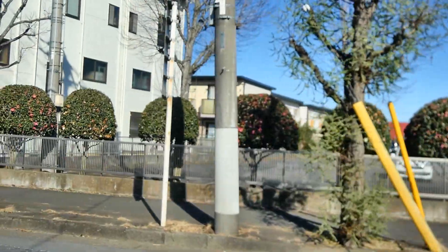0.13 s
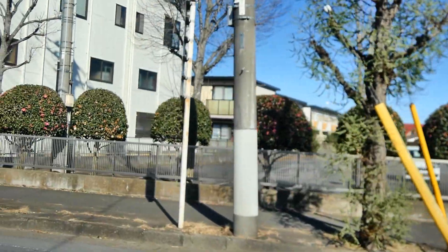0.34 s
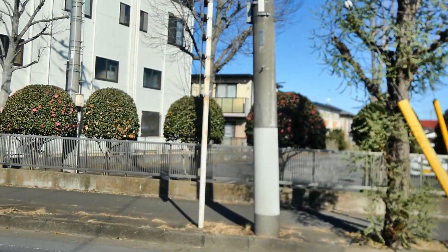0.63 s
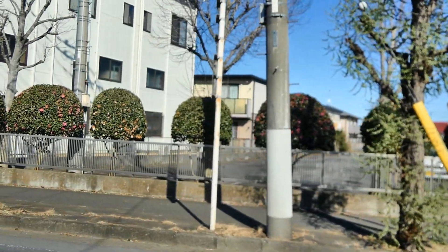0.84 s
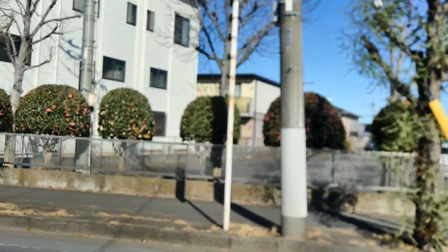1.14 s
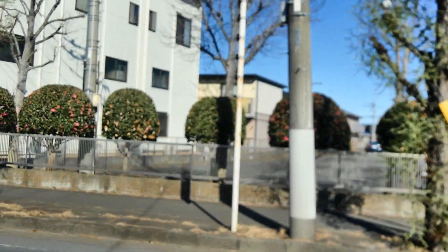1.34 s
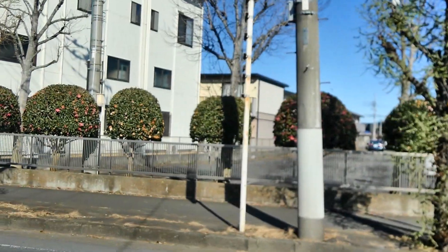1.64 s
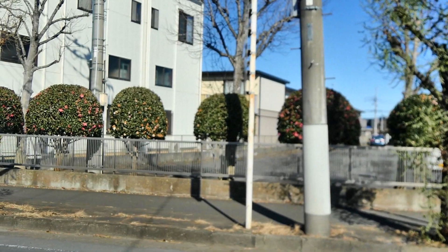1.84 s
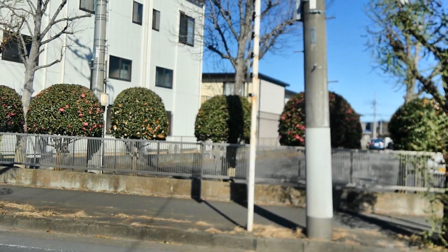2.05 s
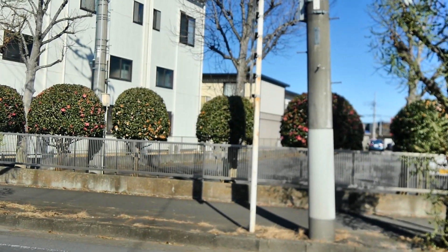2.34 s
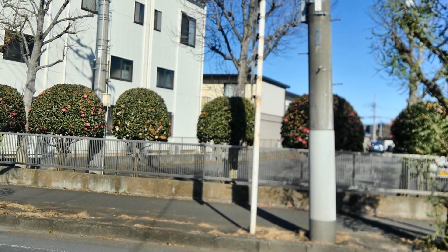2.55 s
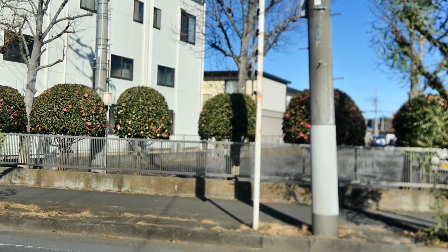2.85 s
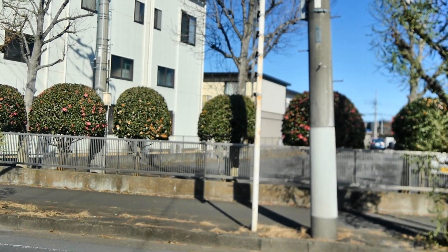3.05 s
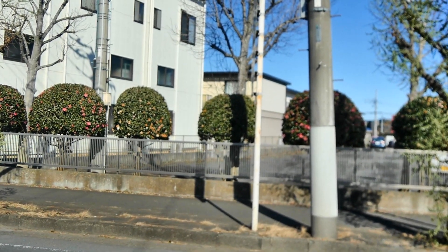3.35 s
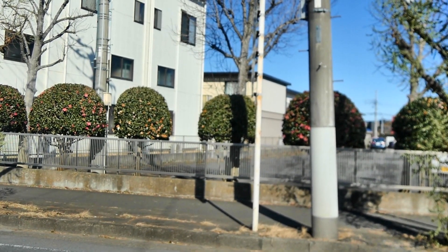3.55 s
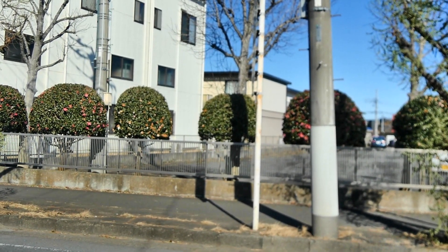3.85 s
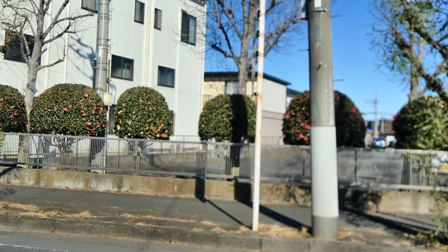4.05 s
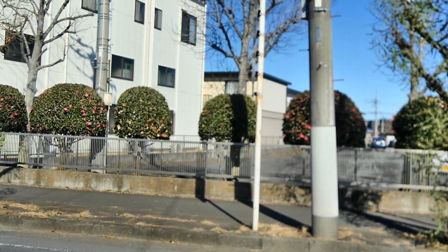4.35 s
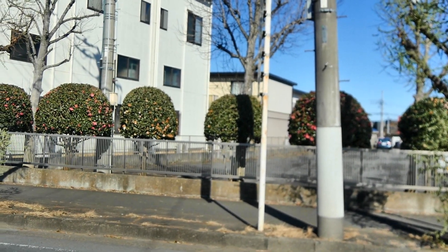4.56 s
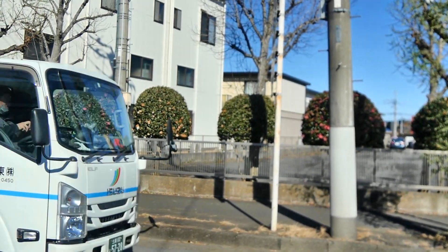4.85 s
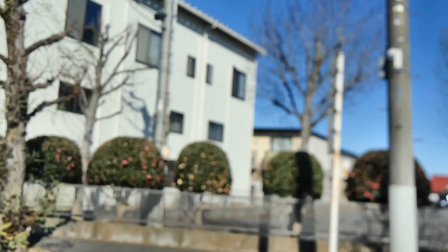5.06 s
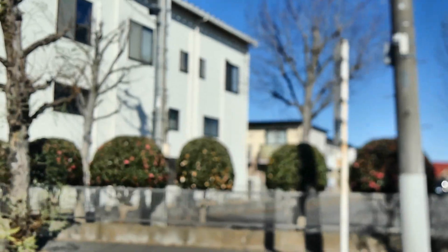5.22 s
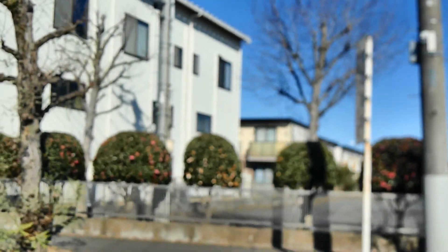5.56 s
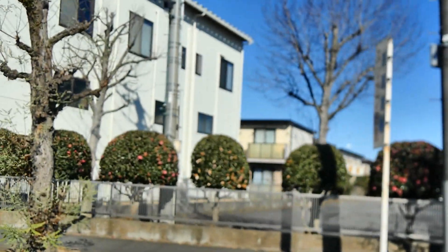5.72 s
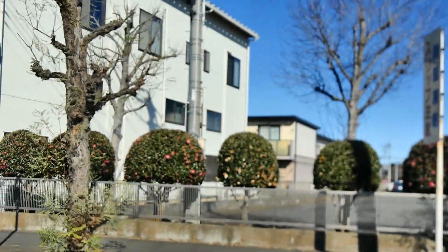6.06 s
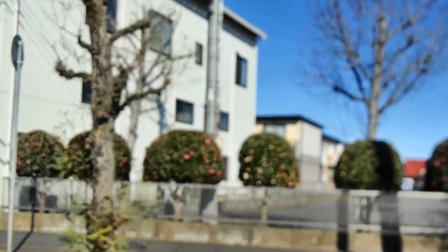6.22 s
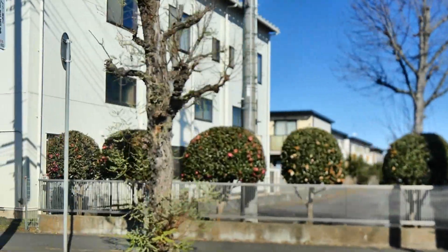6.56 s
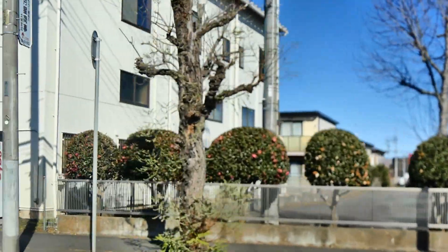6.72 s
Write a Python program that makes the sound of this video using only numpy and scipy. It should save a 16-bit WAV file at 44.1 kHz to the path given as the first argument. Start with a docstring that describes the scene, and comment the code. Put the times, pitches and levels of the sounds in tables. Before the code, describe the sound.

A stationary bus idles quietly, with soft low drumming, pump hum and faint hiss captured by a phone in the cabin. Dull trim knocks, short air puffs and a thin brake squeal come and go; a vehicle's tyre roar swells outside. The sound blanks out briefly, then bursts back with heavy diesel growl, clatter, booming body resonance and thin whines, the note climbing under acceleration.

```python
"""Diesel bus at a stop and pulling away

In the cabin of a six-cylinder bus the engine idles, all sound drops out for a quarter second, then it pulls away.
Firing makes periodic lines and knock bursts; coloured noise makes body drumming, injector clatter and hiss.
Filtered noise makes air valve puffs and bright ticks, contact noise rings the trim's modes, and gliding sines
make squeal, whines and low hums. Passing traffic swells in two noise bands.
A phone hears it all, with a treble notch and a cut top.
"""
import sys
import numpy as np
from scipy import signal
from scipy.fft import rfft, irfft, next_fast_len
from scipy.io import wavfile
from scipy.ndimage import uniform_filter1d

SR = 44100
rng = np.random.default_rng(int(sys.argv[2]) if len(sys.argv) > 2 else 0)


def file_out(sig):
    """Save sig as 16-bit WAV at sys.argv[1]."""
    # one column per channel
    cols = np.atleast_2d(sig).T
    # limit, then scale
    lim = np.clip(cols, -1, 1)
    pcm = np.round(lim * 32767).astype(np.int16)
    wavfile.write(sys.argv[1], SR, pcm)


def undo_db(level):
    """Turn decibels back into plain size, where 20 dB means ten times bigger."""
    steps = np.asarray(level, float) / 20
    return 10 ** steps


N = 303849
T = np.arange(N) / SR
STEP = 64  # samples between points of the slow grid, on which slow changes are drawn
DROPOUT_START_S, DROPOUT_END_S = 5.1712, 5.4166
PULLING = T > DROPOUT_END_S - .1  # the engine's state switches inside the silence
CYCLE_HZ = 4.374  # idle: one full cycle of six firings
LEFTWARD = np.array([[1.5], [-1.5]])  # dB, left and right


def walk(rate):
    """Smoothed random process: levels held 1 / rate s and slewed twice; spread near 1, on the slow grid."""
    k = int(SR / STEP / rate)
    held = np.repeat(rng.standard_normal(N // STEP // k + 2), k)
    return 1.02 * uniform_filter1d(uniform_filter1d(held, k), k)


def fine(slow):
    """Linear interpolation from the slow grid to every sample."""
    return np.interp(T, np.arange(len(slow)) * STEP / SR, slow)


def curve(rows):
    """Linear interpolation of a table's columns against time."""
    s, *columns = np.transpose(rows)
    return [np.interp(T, s, c) for c in columns]


def read(rows, hz):
    """Frequency response: gain at hz of a (frequency [Hz], level [dB]) table, on a logarithmic axis."""
    table = np.array(rows)
    return undo_db(np.interp(np.log(hz), np.log(table[:, 0]), table[:, 1]))


def bell(s, quarter):
    """Smooth swell: 1 at time s, a quarter of that at quarter seconds to either side."""
    return 1 / (1 + ((T - s) / quarter) ** 2) ** 2


# stereo spread of the noises: (frequency [Hz], side minus mid level [dB])
WIDTH = [(25, -28), (60, -35.5), (110, -25.5), (200, -27.5), (380, -20.5), (700, -7), (1290, -1),
         (2380, -0.5), (4400, -1.5), (8120, -1.5), (15000, -4)]


def noise(colour, lo_hz, hi_hz, flicker_db, rate):
    """Spectral shaping: stereo noise in octave bands that flicker alone; rms near 1 from lo_hz to hi_hz."""
    size = next_fast_len(N)
    f = np.maximum(np.arange(size // 2 + 1) * SR / size, 1)
    gain, octave = read(colour, f), np.log2(f)
    mid_side = rfft(rng.standard_normal((2, size))) * [gain, gain * read(WIDTH, f)]
    lowest = int(np.log2(max(colour[1][0], 32)))
    highest = int(np.log2(colour[-2][0])) + 1
    out = 0
    for k in range(lowest, highest + 1):
        band = np.cos(np.pi / 2 * np.clip(octave - k, -1, 1)) ** 2
        flicker = fine(undo_db(flicker_db * walk(rate)))
        out = out + flicker * irfft(mid_side * band, size)[:, :N]
    rms = np.sqrt(2 * np.sum(gain[(f > lo_hz) & (f < hi_hz)] ** 2) / size)
    return np.array([out[0] + out[1], out[0] - out[1]]) / rms


def sine(hz, db, waver_db, rate, blur):
    """Modulated partial: level wanders by waver_db [dB] and phase by blur [rad]."""
    phase = 2 * np.pi * (np.cumsum(hz + 0 * T) / SR + rng.random()) + fine(blur * walk(rate))
    return np.sqrt(2) * undo_db(db) * fine(undo_db(waver_db * walk(rate))) * np.sin(phase)


def tone(rows, waver_db, rate, blur):
    """Frequency glide: thin tones that fade in and out, sometimes overlapping slightly."""
    fade_share = 0.21  # share of a tone's length spent fading in, and again out
    times = np.sort(np.ravel([(s, s + length) for s, length, *_ in rows]))
    hz = np.interp(T, times, np.ravel([row[2:4] for row in rows]))
    gain = 0
    for s, length, _, _, db in rows:
        to_nearer_end = np.minimum(T - s, s + length - T)
        gain = gain + undo_db(db) * np.clip(to_nearer_end / (fade_share * length), 0, 1)
    return gain * sine(hz, 0, waver_db, rate, blur)


# the engine on pulling away:
# (time [s], firing rate [Hz], load [dB], level of the note at four times the firing rate [dB rms])
PULL = [(5.44, 35.9, -0.5, -20.5), (5.57, 36.34, -1, -25), (5.716, 36.77, 0, -21), (5.8, 37.14, 0.5, -21),
        (5.84, 37.14, .5, -25), (5.955, 36.98, 1.5, -22), (5.986, 45.18, 2, -22), (6.146, 48.23, 2, -18.5),
        (6.17, 49.45, 3, -33), (6.232, 51.43, 3.5, -18), (6.27, 52.47, 3, -25), (6.348, 54.91, 3.5, -18),
        (6.385, 55.34, 5.5, -31), (6.415, 55.6, 3.5, -29), (6.44, 56.33, 3, -16), (6.462, 57.2, 4, -15.5),
        (6.53, 60.42, 4, -18), (6.586, 61.32, 5, -24), (6.646, 62.04, 5, -14), (6.748, 66.1, 5.5, -20.5),
        (6.782, 65.96, 3.5, -16.5), (6.89, 66.33, 1.5, -18)]


def pull_away():
    """Engine kinematics: firing rate [Hz], load [dB] and the fourth multiple's level [dB] against time."""
    return curve(PULL)


def eased():
    """Sigmoid transition: near 0 while the load comes on, towards 1 once the engine runs freely."""
    middle_s, length_s = 5.755, 0.099
    return (1 + np.tanh((T - middle_s) / length_s)) / 2


def load_gain(idle_db, pull_db, slope):
    """Load dependence: a fixed idle level, then slope dB gained for each dB of load."""
    return undo_db(np.where(PULLING, pull_db + slope * pull_away()[1], idle_db))


# traffic outside: (nearest time [s], hiss [dB], tyre roar [dB], time to a quarter of the power [s])
PASSES = [(.4, -63, -56, 0.34), (1.15, -67, -70, 0.27), (3.76, -69.5, -54, .05), (4.32, -64.5, -59, 0.22),
          (5.0, -63.5, -46, 0.66)]


def traffic_powers():
    """Incoherent addition: the passes' hiss powers and tyre roar powers each sum."""
    hiss = sum(undo_db(db) ** 2 * bell(s, quarter) for s, db, _, quarter in PASSES)
    roar = sum(undo_db(db) ** 2 * bell(s, quarter) for s, _, db, quarter in PASSES)
    return hiss, roar


# hiss of passing traffic: (frequency [Hz], relative density per Hz [dB])
PASS_HISS = [(2500, 0), (4000, -3.5), (6500, -10), (8000, -9.5), (10300, -6), (12500, -12.5), (14500, -13),
             (15600, -28.5)]


def traffic_hiss(power):
    """Amplitude modulation: treble noise swells with each pass, up to the pull-away."""
    return np.sqrt(power) * ~PULLING * noise(PASS_HISS, 4800, 17500, 0.81, 19)


# hiss in the cabin at idle, then on pulling away: (frequency [Hz], relative density per Hz [dB])
HISS = [(2060, -5), (3500, -1), (4640, -7.5), (6740, -9), (7730, -11.5), (9150, -8), (11300, -8.5),
        (14500, -20.5), (15600, -33)]
PULL_HISS = [(2060, -27), (3500, 0), (4640, -3), (6000, -5.5), (7000, -9.5), (7730, -9.5), (9150, -6),
             (11300, -8), (14500, -20), (15600, -27)]


def cabin_hiss():
    """Broadband noise radiation: it follows the load, with more hiss while the load comes on."""
    take_up_db = 4
    gain = load_gain(-68, -59.5, 0.49) * undo_db(PULLING * take_up_db * (1 - eased()))
    pull = noise(PULL_HISS, 5100, 14000, 0.96, 14.0)
    idle = noise(HISS, 5160, 14000, 0.32, 5.5)
    return gain * np.where(PULLING, pull, idle)


# thin driveline whines: (time [s], length [s], first frequency [Hz], last frequency [Hz], level [dB rms])
WHINES = [(-.08, 0.42, 1740, 1750, -60.5), (.32, 0.17, 1745, 1740, -66), (.52, 0.13, 1745, 1760, -66),
          (2.39, .13, 3130, 3100, -68.5), (5.02, 0.11, 2000, 1980, -61), (5.75, 0.301, 2003, 1930, -56.5),
          (6.3, 0.41, 1957, 1950, -55), (6.72, .2, 1938, 1988, -55.5)]


def whines():
    """Narrow-band tonal radiation: driveline whines glide slightly, nearer the left."""
    return tone(WHINES, 3.5, 40, .9) * undo_db(LEFTWARD)


# brake squeal: (time [s], frequency [Hz], level [dB rms])
SQUEAL = [(.54, 9615, -90), (.565, 9600, -62), (.62, 9620, -60), (.69, 9640, -52.5), (.728, 9690, -57),
          (.745, 9690, -76), (.78, 9700, -72), (.82, 9720, -84), (.87, 9720, -84), (.915, 9730, -70),
          (.95, 9745, -88), (1.01, 9690, -88), (1.03, 9680, -63), (1.064, 9665, -59), (1.1, 9630, -62),
          (1.17, 9615, -57), (1.2, 9615, -74), (1.225, 9610, -62), (1.25, 9590, -70), (1.265, 9580, -65),
          (1.31, 9545, -68), (1.34, 9525, -57), (1.43, 9490, -67), (1.447, 9495, -80), (1.48, 9500, -67),
          (1.504, 9500, -80), (1.53, 9505, -67), (1.565, 9490, -80), (1.63, 9480, -80), (1.69, 9475, -74),
          (1.72, 9470, -80), (1.75, 9470, -70), (1.78, 9470, -91)]


def squeal():
    """Sustained oscillation: the brake sings one thin, wavering line, nearer the left."""
    hz, db = curve(SQUEAL)
    return sine(hz, db, 3.6, 60, .7) * undo_db(LEFTWARD)


# spectra of the bright jet, and of its body: (frequency [Hz], relative density per Hz [dB]) in each
PUFF = [
    [(2940, -40), (3800, -18), (4400, -11.5), (5050, -20), (5370, -12.5), (6250, -3.5), (6650, -4.5),
     (7450, -7), (8080, -5), (8680, -8.5), (10100, -2.5), (11500, -7), (12700, -11), (13600, -14.5),
     (15600, -21.5)],
    [(500, -35.5), (900, 5.5), (1500, -7.5), (2300, -7.5), (3500, -8.5), (5000, -10.5), (7000, -32.5)],
]
# air valve puffs, and short bright ticks that go with knocks:
# (time [s], jet [dB], body [dB], open time [s])
PUFFS = [(.28, -65, -73, .08), (.423, -59, -70, .004), (0.964, -61, -64, 0.025), (1.015, -64, -65, 0.025),
         (1.79, -57, -56, 0.0095), (1.806, -53.5, -59, 0.027), (1.847, -61, -56.5, 0.026),
         (1.917, -47.5, -58, 0.021), (1.956, -49, -56, 0.035), (2.845, -63.5, -63, 0.048),
         (2.95, -63.5, -58, 0.026), (3.968, -66.5, -57, 0.01), (4.371, -50.5, -59, 0.015),
         (4.381, -50.5, -45.5, 0.021), (4.393, -47.5, -47.5, 0.011), (4.413, -50.5, -50.5, 0.024),
         (5.492, -47, -46, 0.0057), (6.54, -54, -50.5, 0.065)]


def puffs_and_ticks():
    """Noise envelopes: air valve puffs, and bright ticks that go with knocks; longer ones rise and fall slower."""
    rise_share, fall_share = 0.26, 1.94  # rise time and time to fall 20 dB, as shares of the open time
    shape = np.zeros((2, N))
    for s, jet_db, body_db, length in PUFFS:
        rise = np.clip((T - s) / (rise_share * length), 0, 1)
        fall = undo_db(-20 * np.maximum(T - s - length, 0) / (fall_share * length))
        shape += rise * fall * undo_db(np.array([[jet_db], [body_db]]))
    jet = shape[0] * noise(PUFF[0], 5000, 15000, 2.0, 110)
    body = shape[1] * noise(PUFF[1], 885, 5600, 7.1, 40)
    return jet + body


# knocks in the trim, peak levels: (time [s], body [dB], ring [dB], crack [dB], rattle decay time [s])
KNOCKS = [(.101, -27, -58, -64, .014), (.383, -26, -54, -58, .012), (.79, -30, -58, -64, .01),
          (1.783, -28, -52, -54, .008), (1.833, -27, -52, -62, .012), (1.86, -28, -41, -62, .03),
          (1.878, -32, -45, -64, .02), (2.382, -29, -58, -64, .01), (2.85, -24, -40, -66, .016),
          (2.863, -30, -45, -68, .012), (2.882, -27, -41, -67, .022), (2.962, -24, -39, -67, .016),
          (2.992, -27, -46, -64, .015), (3.965, -20, -48, -60, .018), (4.385, -30, -46, -56, .012),
          (5.484, -23, -50, -50, .004), (5.495, -28, -37, -37, .003), (5.535, -40, -50, -44, .012),
          (5.655, -30, -44, -45, .015), (5.7, -40, -46, -38, .006), (5.787, -40, -48, -43, .006),
          (6.355, -21, -46, -52, .008), (6.7337, -45, -50, -32, .0015)]
# modes of the trim, each level varied at random per knock: (frequency [Hz], level [dB], T60 [s])
TRIM = [(300, -2, .06), (420, 0, .05), (560, -1, .035), (720, -1, .025), (900, -1, .022), (1080, -1, .02),
        (1350, -5, .02), (1600, -8, .025), (1850, -9, .02), (2150, -10, .02), (2340, 0, .035),
        (2550, -9, .02)]


def knocks():
    """Modal excitation: a short contact rattle cracks and rings the trim; the body is nearly alike left and right."""
    pad_s, ring_contact_s = .0015, .016  # the padding gives; only the first contacts ring the high modes
    strike = 2.5  # added to the rattle at the first contact
    out, t = np.zeros((2, N + SR)), T[:SR // 5]
    mix = rng.standard_normal((len(KNOCKS), len(TRIM)))
    rattle = rng.standard_normal((len(KNOCKS), 3, len(t)))  # shared, left, right
    edge = signal.butter(3, [2900., 6000.], "bandpass", fs=SR, output="sos")
    padded = signal.butter(3, [200., 1350.], "bandpass", fs=SR, output="sos")  # a padded blow rings low modes
    for (s, *levels, length), mixes, rattles in zip(KNOCKS, mix, rattle):
        modes = []
        for k, ((hz, db, t60), chance) in enumerate(zip(TRIM, mixes)):
            decay = undo_db(db + 2.0 * chance - 60 * t / t60)
            modes.append(decay * np.sin(2 * np.pi * hz * t) * (-1) ** k)
        contact = (rattles + strike * (t < .0001)) * np.exp(-t / length)
        shared, sides = contact[:1], contact[1:]
        blow = signal.sosfilt(padded, (shared + 0.23 * sides) * (1 - np.exp(-t / pad_s)))
        body = signal.fftconvolve([sum(modes[:7])], blow, axes=1)[:, :len(t)]
        tap = (shared + .7 * sides) * np.exp(-t / ring_contact_s)
        ring = signal.fftconvolve([sum(modes[7:])], tap, axes=1)[:, :len(t)]
        crack = signal.sosfilt(edge, shared + 0.61 * sides)
        start = int(s * SR)
        for db, part in zip(levels, (body, ring, crack)):
            out[:, start:start + len(t)] += undo_db(db) * part / abs(part).max()
    return out[:, :N]


# injector clatter: (frequency [Hz], relative density per Hz [dB])
CLATTER = [(290, -51.5), (500, -1), (606, -0.5), (701, -6), (749, 0.5), (833, -0.5), (1100, -8.5),
           (1440, -15.5), (1780, -18), (2080, -22), (2290, -21.5), (3120, -31), (5000, -52.5), (6500, -70),
           (11000, -120)]


def clatter(roar_power):
    """Incoherent addition: injector clatter and tyre roar add in power and share one noise."""
    gain = np.sqrt(load_gain(-44.5, -37.5, 0.92) ** 2 + roar_power)
    return gain * noise(CLATTER, 728, 2940, 2.03, 14) * undo_db(np.array([[.8], [-.8]]))


# low hums on pulling away: (time [s], length [s], first frequency [Hz], last frequency [Hz], level [dB rms])
LOW_HUMS = [(5.378, 0.25, 246.6, 252.7, -26.5), (5.94, .11, 112, 112, -26), (5.95, .08, 146, 141, -28),
            (6.199, 0.35, 440.3, 478.3, -26), (6.4, 0.24, 113.4, 114.4, -33.5), (6.7, .25, 138, 139.5, -25)]


def low_hums():
    """Tonal radiation: low hums on pulling away, some held, one rising with the engine."""
    return sum(tone([row], 1.2, 23, .2) for row in LOW_HUMS)


# body drumming on pulling away: (frequency [Hz], relative density per Hz [dB])
DRUM_PULL = [(12, -59), (20, -36), (43, -30), (107, -6.5), (161, -1.5), (201, -1), (243, -6.5), (291, -3.5),
             (398, -10.5), (448, -6.5), (528, -22.5), (640, -27), (700, -24.5), (910, -45), (1540, -120)]


def cycle_drum():
    """Fourier series: uneven cylinders sound every sixth of the firing rate, coloured by the body; rms near 1."""
    start = int(5.3 * SR)
    cycle_hz = pull_away()[0][start::8] / 6  # every eighth sample is enough for these low lines
    order = np.arange(8, 110)[:, None]
    chance = rng.standard_normal((len(order), 2))
    # no two cycles burn quite alike, so each line swells and fades
    swells = np.repeat([walk(9)[:len(cycle_hz) // 8 + 1] for _ in order], 8, axis=1)
    waver = uniform_filter1d(swells[:, :len(cycle_hz)], size=8)
    strength = undo_db(1.1 * chance[:, :1] + 4.3 * waver + 3.4 * (order % 3 == 0))
    strength = strength * read(DRUM_PULL, order * cycle_hz)
    phase = 2 * np.pi * order * np.cumsum(cycle_hz) * 8 / SR + 9 * chance[:, 1:]
    lines = np.sum(strength * np.sin(phase), axis=0)
    lines = lines / uniform_filter1d(lines ** 2, size=1500) ** .5
    return np.r_[np.zeros(start), signal.resample_poly(lines, 8, 1, padtype="antireflect")][:N]


# body drumming at idle: (frequency [Hz], relative density per Hz [dB])
DRUM_IDLE = [(12, -63), (20, -39.5), (48, -20.5), (77, -11), (163, -1.5), (282, -4), (448, -5.5),
             (512, -13.5), (669, -24), (700, -11.5), (910, -30.5), (1540, -120)]
# the body shudders: (time [s], drumming gained [dB], time to a quarter of that gain [s])
SHUDDERS = [(.79, 2.5, .08), (1.9, 3, 0.14), (2.95, 5.5, 0.083), (4.02, 2, 0.068), (4.45, 2.5, 0.084)]


def body_drum():
    """Structural response: the body drums in noise at idle, in noise and cycle lines on pulling away."""
    swell_db, swell_hz = 0.5, 3.3  # the idle drumming swells unevenly
    gain = load_gain(-35, -18, 1) * undo_db(sum(db * bell(s, quarter) for s, db, quarter in SHUDDERS))
    idle = fine(undo_db(swell_db * walk(swell_hz))) * noise(DRUM_IDLE, 60, 546, 0.63, 7.8)
    pull = undo_db(-6.0) * noise(DRUM_PULL, 60, 550, 3.0, 12) + undo_db(-3.5) * cycle_drum()
    return gain * np.where(PULLING, pull, idle)


def bursts(width):
    """Impulsive excitation: a decaying burst after each firing, with its own strength; width in firing periods."""
    first_firing_s = 5.439  # after the silence
    turns = np.cumsum(np.where(PULLING, pull_away()[0], 6 * CYCLE_HZ)) / SR
    turns = turns - turns[int(first_firing_s * SR)] % 1 + 1
    strength = undo_db(1.8 * rng.standard_normal(512))[turns.astype(int)]
    return uniform_filter1d(strength * np.exp(-(turns % 1) / width), size=110)


# diesel knock: (frequency [Hz], relative density per Hz [dB])
KNOCK = [(600, -23), (1000, 9), (1700, 3), (2000, -0.5), (2350, -0.5), (2800, -3.5), (3400, -15),
         (4400, -10.5), (6000, -25), (7500, -23), (12000, -29.5)]


def diesel_knock():
    """Combustion impact: each firing raps the block, faint at idle and hardest as the load comes on."""
    idle_db, take_up_db, running_db = -64, -34.5, -44.5
    db = np.where(PULLING, take_up_db + eased() * (running_db - take_up_db), idle_db)
    return undo_db(db) * bursts(0.24) * noise(KNOCK, 600, 5000, 0.91, 30)


# idle lines of uneven cylinders: (multiple of the cycle rate [1], level [dB rms])
IDLE_ORDERS = [(6, -67), (18, -55), (20, -57), (23, -47), (24, -53), (25, -50), (26, -50), (29, -49),
               (30, -45), (31, -47), (33, -46), (34, -46), (36, -43), (38, -39), (40, -50), (42, -45),
               (50, -46), (52, -52), (60, -51), (66, -51), (72, -51), (76, -52), (78, -52), (80, -52),
               (82, -47), (84, -50), (92, -51), (99, -49), (100, -50), (102, -51), (106, -49)]
# steady hums of belt-driven pumps, off the cycle: (frequency [Hz], level [dB rms])
HUMS = [(119.7, -52), (171.5, -35), (198.4, -47), (239.1, -43)]


def idle_lines():
    """Periodicity: a repeating cycle gives lines at fixed pitch; pumps hum between. Level and phase wander."""
    t, out = T[::16], 0
    slow_t = np.arange(len(walk(4))) * STEP / SR
    for hz, db in [(k * CYCLE_HZ, db) for k, db in IDLE_ORDERS] + list(HUMS):
        waver, blur = np.interp(t, slow_t, walk(4)), np.interp(t, slow_t, walk(4))
        phase = 2 * np.pi * (hz * t + rng.random()) + .33 * blur
        out = out + np.sqrt(2) * undo_db(db + 2.2 * waver) * np.sin(phase)
    return signal.resample_poly(out, 16, 1, padtype="antireflect")[:N]


# firing lines at zero load, before the boom: (multiple of the firing rate [1], level [dB rms])
FIRING_ORDERS = [(1, -35.5), (2, -37.5), (3, -30), (5, -35.5), (7, -38), (8, -33)]
# the cabin booms at some pitches: (frequency [Hz], gain [dB])
BOOM = [(30, -8), (48, -17), (66, 1.5), (80, 3.5), (108, 2.5), (120, -4), (130, -7), (145, -6), (165, -8),
        (190, -6), (207, -5), (222, 6), (255, 1.5), (290, -3), (335, -9.5), (400, -8), (450, 2), (500, -17)]


def firing_lines():
    """Harmonics through resonances: firing multiples cross the cabin's booms; the fourth follows its own levels."""
    hz, load_db, note_db = pull_away()
    rate = 14  # wanderings per second
    # the note at four times the firing rate swells and fades by its own table column
    out = sine(4 * hz, note_db, 1, rate, .2)
    for order, db in FIRING_ORDERS:
        line_hz = int(order) * hz
        out = out + read(BOOM, line_hz) * sine(line_hz, db + 0.82 * load_db, 2.6, rate, .45)
    return out


def scene():
    """Superposition: idle, then pull-away, with traffic, brake, air and trim around the engine."""
    hiss_power, roar_power = traffic_powers()
    hiss = traffic_hiss(hiss_power) + cabin_hiss()
    tones = whines() + squeal() + low_hums()
    engine_lines = np.where(PULLING, firing_lines(), idle_lines())
    engine = engine_lines + body_drum() + clatter(roar_power) + diesel_knock()
    return hiss + tones + puffs_and_ticks() + knocks() + engine


def roll_off(x):
    """The treble ends steeply here."""
    return signal.sosfilt(signal.butter(12, 15500, fs=SR, output="sos"), x)


def record(dry):
    """Linear filtering and gating: the phone notches the treble, cuts the top and loses a quarter second."""
    heard = signal.lfilter(*signal.iirnotch(7870., 30., SR), dry)
    heard = signal.sosfilt(signal.ellip(10, .2, 60, 15250, fs=SR, output="sos"), heard)
    live = (T < DROPOUT_START_S) + np.clip((T - DROPOUT_END_S) / 0.00086, 0, 1)  # returns within 0.86 ms
    return roll_off(heard * live)


dry = scene()
out = record(dry)
file_out(out)
```